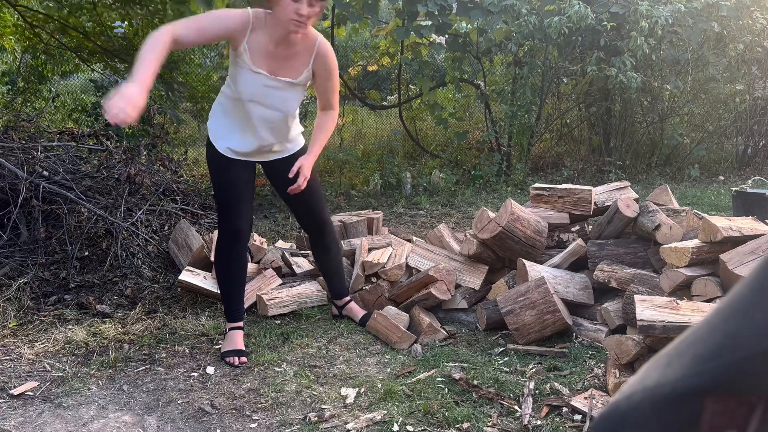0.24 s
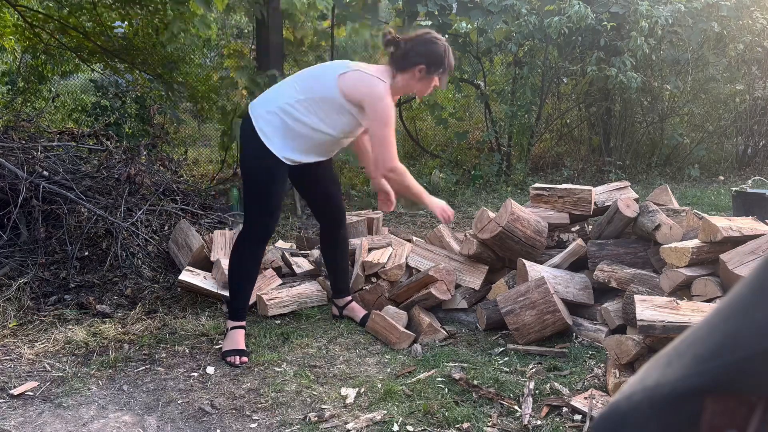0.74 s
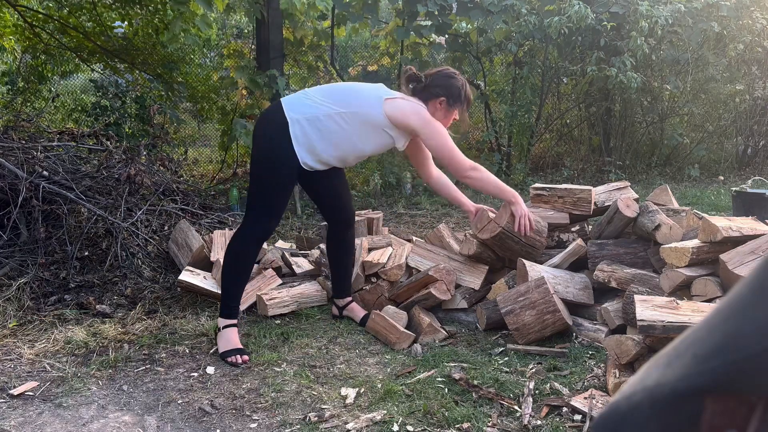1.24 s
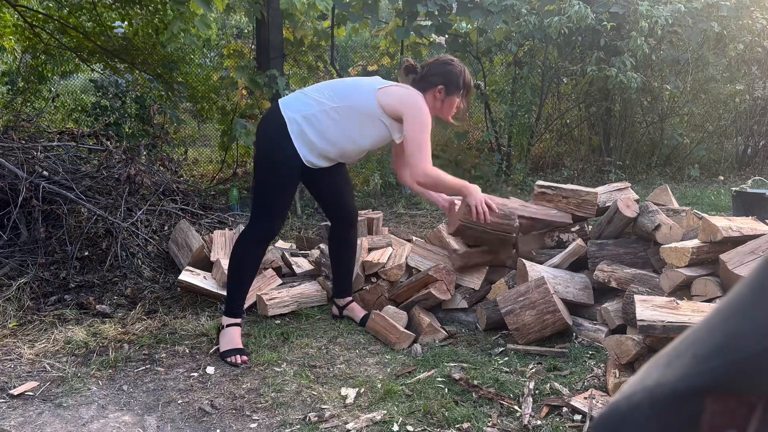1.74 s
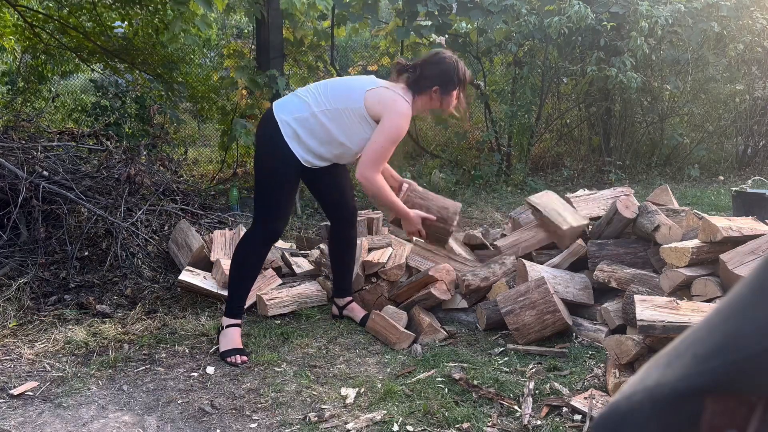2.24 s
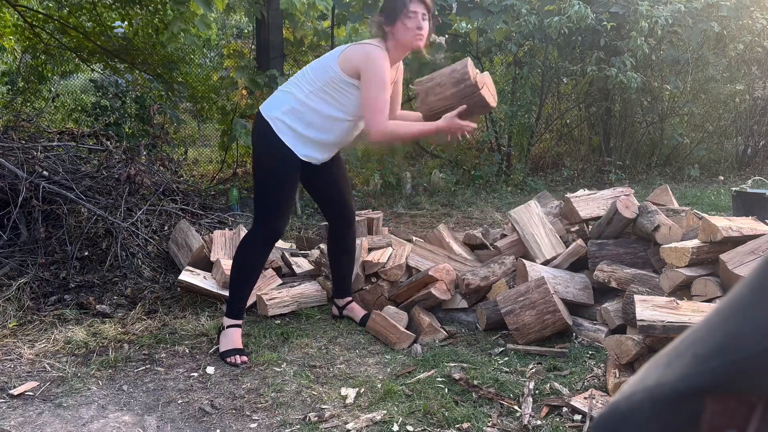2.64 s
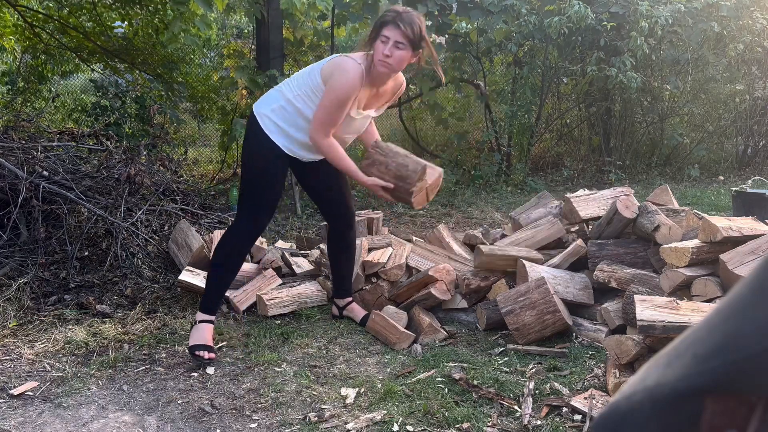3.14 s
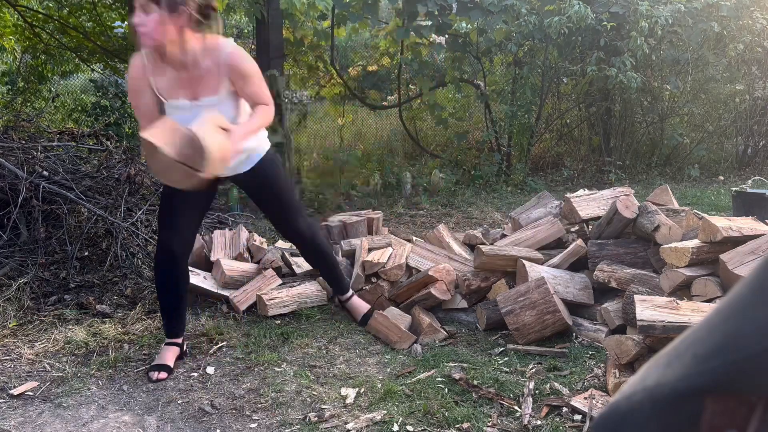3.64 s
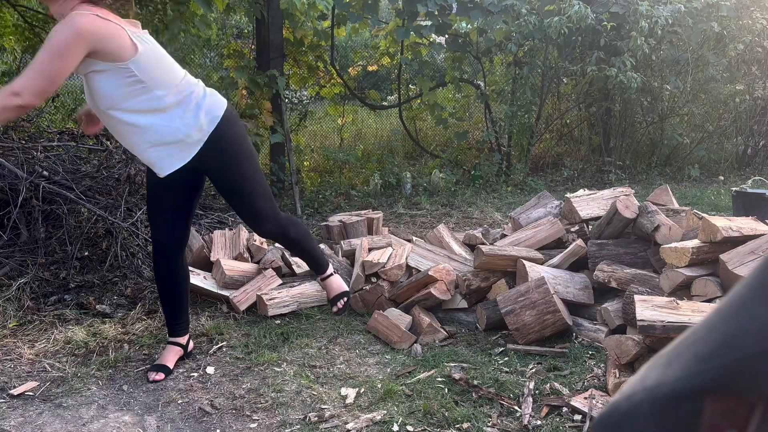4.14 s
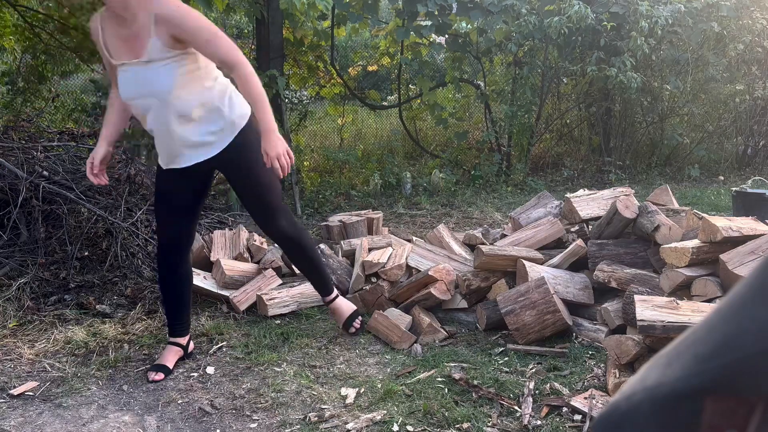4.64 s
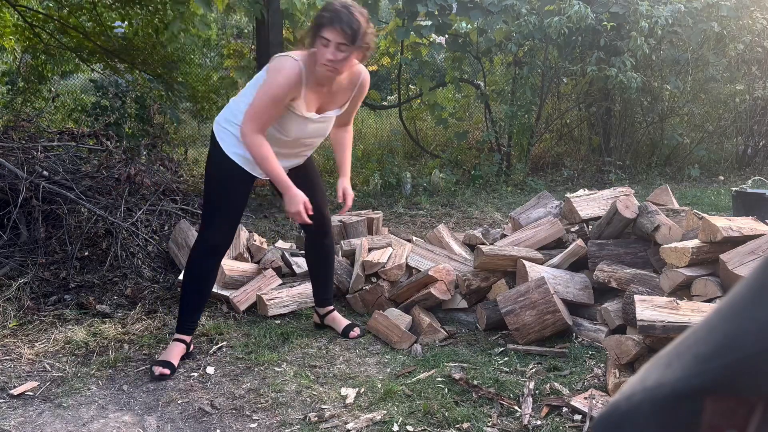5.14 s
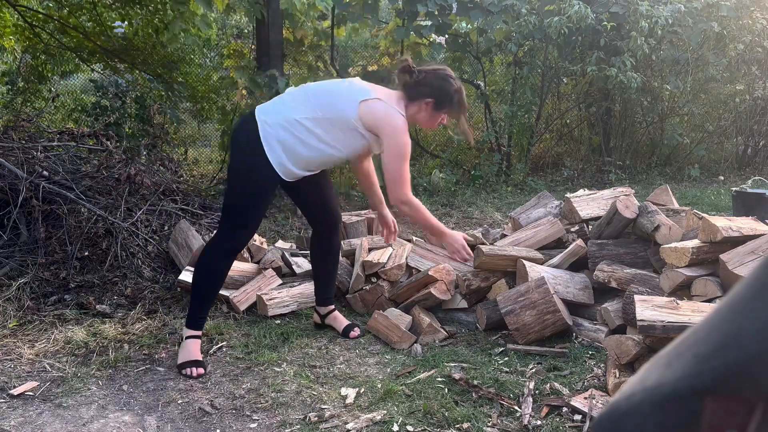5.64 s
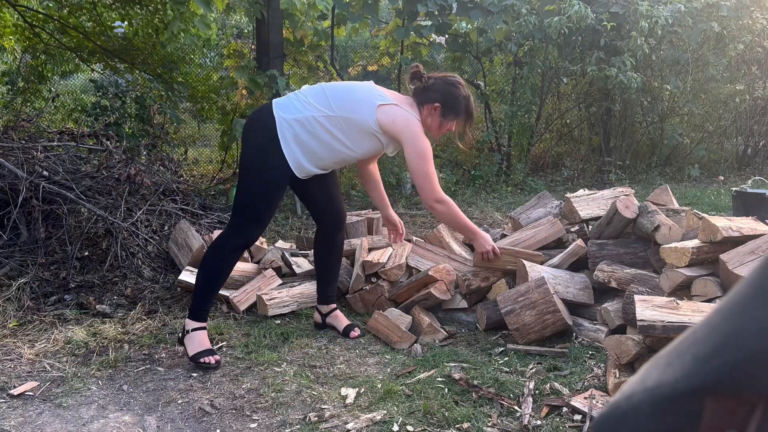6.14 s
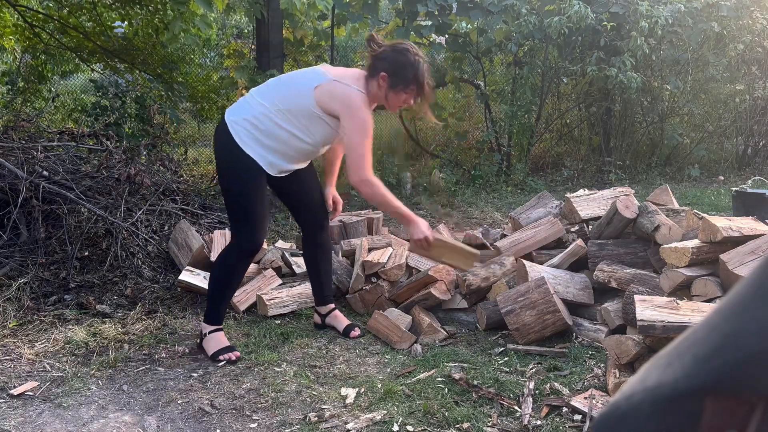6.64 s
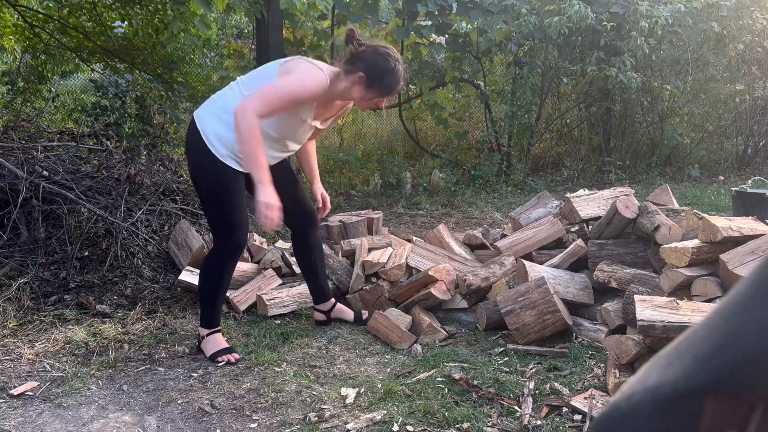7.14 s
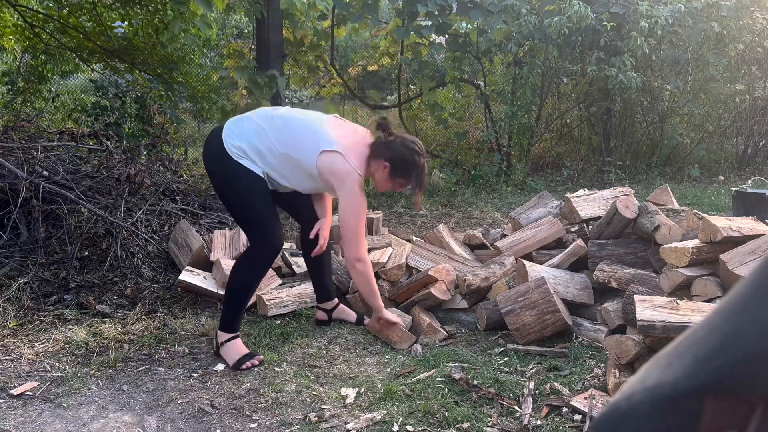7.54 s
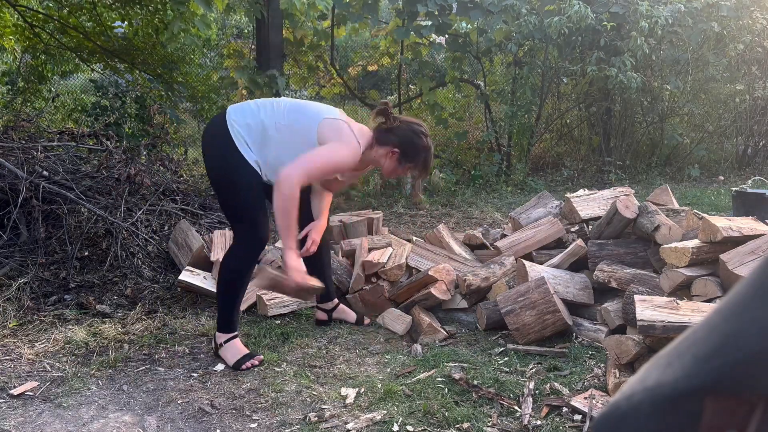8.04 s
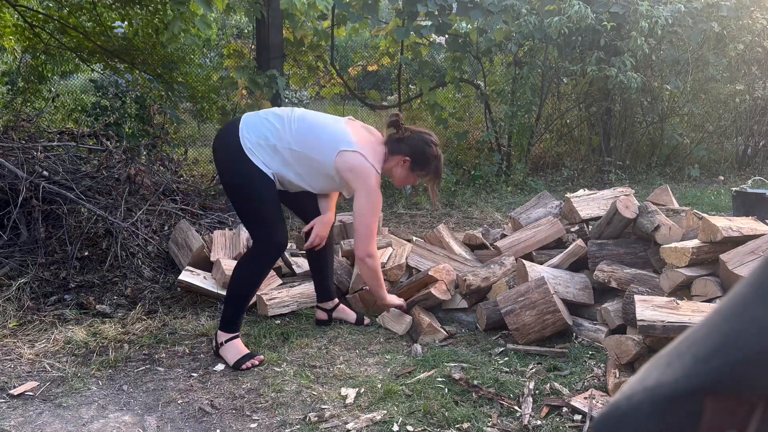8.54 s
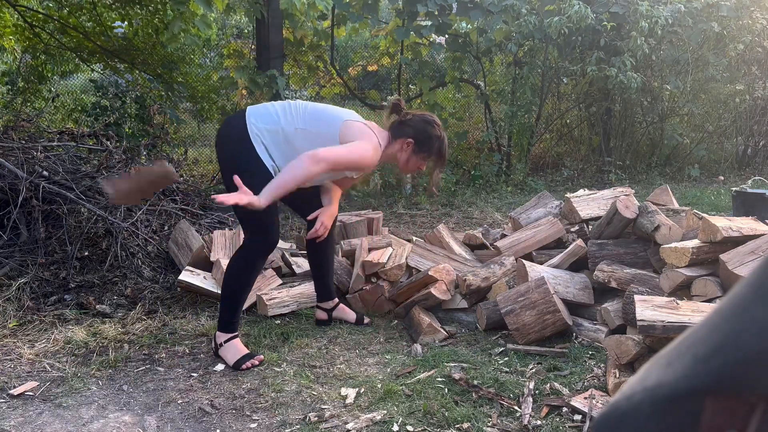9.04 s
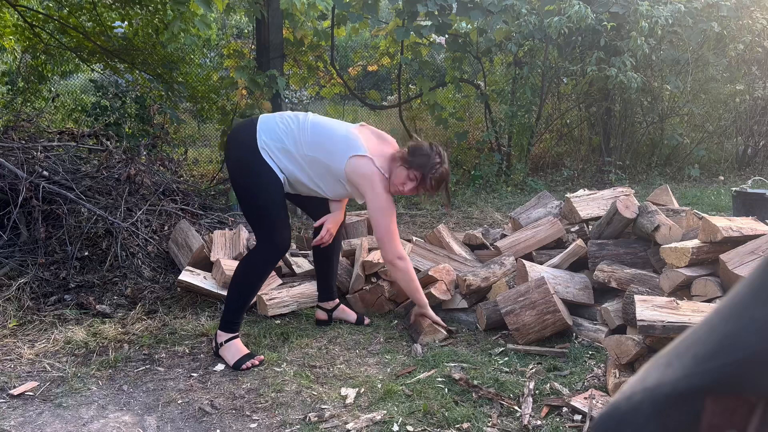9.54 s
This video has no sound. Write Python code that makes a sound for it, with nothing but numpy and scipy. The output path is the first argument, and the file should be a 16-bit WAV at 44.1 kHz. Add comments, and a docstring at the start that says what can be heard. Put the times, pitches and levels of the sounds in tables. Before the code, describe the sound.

A quiet wooded yard heard in stereo, with soft distant low rumble. Four throws of firewood strike a heap on the left: one early, a longer clattering tumble midway, a bright knock later and a softer one near the end. Between them, close and central, rough bark rubs, logs shuffle with muted thumps, twigs crack, gripped wood creaks faintly and little metal pieces jingle very high. The trees return a slight dull echo.

```python
"""A low distant rumble comes first; then bark scrapes, the near woodpile shifts and twigs snap.
Split logs land on a heap off to the left, where they knock, bounce and settle: struck modes, thuds and cracks.
Held wood creaks and squeaks as it sticks and slips; small metal pieces, like jewellery, tinkle as high modes.
The heap scatters every blow and the trees return a faint echo, both made of decaying noise."""
import sys
import numpy as np
from scipy import signal
from scipy.fft import rfft, irfft, next_fast_len
from scipy.io import wavfile
from scipy.ndimage import uniform_filter1d, map_coordinates

SR = 44100
rng = np.random.default_rng(int(sys.argv[2]) if len(sys.argv) > 2 else 0)


def bounce(signal):
    """Save signal as a 16-bit WAV file at the path given by the first command-line argument."""
    frames = np.transpose(np.atleast_2d(signal))
    limited = np.clip(frames, -1, 1)
    pcm = np.round(limited * 32767).astype(np.int16)
    wavfile.write(sys.argv[1], SR, pcm)


N = 431738
T = np.arange(SR // 2) / SR  # the time of one blow [s]
TOP_HZ = 16000
AIR_DB = -62

# All levels in the tables are relative: each layer has its own trim.
# spectrum of the distant rumble: (frequency [Hz], level [dB])
AIR = [(20, -34.5), (40, -8.5), (72, 0.5), (110, -8), (200, -15), (400, -18), (650, -18.5), (900, -25),
       (1400, -26), (2200, -42.5), (5000, -44.5), (10000, -48.5), (16000, -56)]
# quiet rustle of bark and litter between strokes: (time [s], treble level [dB], highest hiss level [dB])
RUSTLE = [(0.0, -117, -112), (0.38, -103.5, -91), (1.5, -73.5, -76.5), (1.96, -66, -71.5),
          (3.9, -68.5, -72), (4.2, -79, -80), (4.55, -78, -76.5), (4.71, -56, -76), (5.62, -63.5, -89),
          (5.97, -81.5, -64.5), (6.13, -72.5, -82.5), (6.65, -99, -90.5), (7.5, -85.5, -84.5),
          (7.99, -62, -74), (8.4, -108, -100), (9.03, -99, -91), (9.21, -64, -77), (9.79, -86.5, -84)]
# bark sliding over bark or litter: (time [s], length [s], scrape level [dB], hiss level [dB])
SCRAPES = [(0.416, 0.12, -74, -72), (0.535, 0.03, -63, -78), (1.228, 0.14, -53, -64.5),
           (1.467, 0.051, -55.5, -57), (1.944, 0.081, -53.5, -54), (2.37, 0.044, -66.5, -62),
           (2.689, 0.07, -55, -60.5), (3.065, 0.028, -72, -50), (3.158, 0.055, -57, -59),
           (3.381, 0.086, -53.5, -55), (3.558, 0.019, -56.5, -54), (3.696, 0.06, -52.5, -59),
           (3.923, 0.035, -61, -59.5), (4.665, 0.036, -41, -59), (4.883, 0.17, -58, -65),
           (5.092, 0.074, -49.5, -72), (5.28, 0.063, -56.5, -71), (5.456, 0.016, -39.5, -63),
           (5.779, 0.072, -49.5, -65), (6.03, 0.047, -53.5, -68), (6.311, 0.05, -58.5, -66.5),
           (6.906, 0.045, -57, -62), (7.583, 0.048, -65.5, -65), (8.103, 0.067, -59, -67),
           (8.728, 0.053, -66, -67.5), (9.03, 0.17, -59, -72), (9.304, 0.03, -52.5, -72),
           (9.452, 0.096, -67, -75.5), (9.577, 0.058, -59, -67)]
SCRAPE_ATTACK_S, SCRAPE_RELEASE_T60 = 0.021, 0.058
# spectra of a scrape and of its hiss: (frequency [Hz], level [dB])
SCRAPE = [(500, -7.5), (900, -7.5), (1350, -2.5), (1750, -5), (2300, -5.5), (3700, -8.5), (6000, -7.5),
          (8000, -15.5), (12000, -38.5)]
HISS = [(4000, -15.5), (7000, -8.5), (8900, -2.5), (9800, 4), (10900, -4), (13500, -7), (16000, -10)]
# where wood is handled, as the delay to the right microphone: (time [s], lag [ms])
HANDLING_LAG = [(1.55, .44), (1.65, .03), (3.2, .03), (3.3, .29), (4.5, .29), (4.6, .44)]
# logs shifting in the near pile: (time [s], strength [dB], weight of the thud [dB],
# hardness of the contact [dB], freedom to ring [dB], own note [Hz])
SHIFTS = [(0.421, -64, 12, -11, 14.5, 253), (1.526, -48, 4.5, -2, -11, 302),
          (1.675, -46.5, -8, -10, 2, 486), (1.772, -54.5, 8, -7, 1, 316), (1.875, -47.5, 7.5, -1, -3, 390),
          (1.936, -45, 8.5, 0, 2, 433), (1.954, -51, 2.5, 7, 10.5, 1400), (1.989, -48.5, 3, 5, 2.5, 350),
          (2.059, -43, -1, -6, -8, 414), (2.082, -47.5, 9, -4, 5, 277), (2.115, -33, 0, -16, 1, 440),
          (2.299, -61.5, 17.5, 2, 13, 1410), (2.672, -61.5, 2, 11.5, 11, 525),
          (2.726, -55.5, 8, 12.5, 5.5, 1880), (2.868, -60.5, 15.5, 16, -16.5, 412),
          (2.984, -67.5, 22, 13, -5, 311), (3.133, -54, 13, 6.5, -20, 280.6),
          (3.368, -49.5, -5, 19, -5, 525), (3.681, -53, -1.5, -3.5, -5.5, 393),
          (5.677, -50, 6, -2, -9, 264), (5.778, -47, 13, 5.5, -21, 263.5), (5.862, -47, 7.5, 3.5, -14, 289),
          (6.024, -59, 22, 11, -25, 327), (7.444, -49, -2.5, -6.5, 2.5, 367.3)]
# logs landing and tumbling on the heap: (time [s], strength [dB], weight of the thud [dB],
# hardness of the contact [dB], freedom to ring [dB], own note [Hz])
LANDINGS = [(0.891, -17.5, -6, -3.5, 4.5, 516), (0.922, -26, -1.5, 1, 4, 585), (0.933, -33, -4, -8, 8, 400),
            (0.94, -41.5, -6, -2, 5, 2100), (0.963, -33.5, -20, -17, -2, 467),
            (1.206, -44.5, 16.5, -6, 3.5, 377), (4.531, -26.5, 0.5, 4.5, -1, 556),
            (4.533, -17, 3, 2.5, -1.5, 558.7), (4.542, -28, 3, 5.5, 1.5, 1950),
            (4.563, -27, -3, -9, -8, 343), (4.573, -35, -9.5, 7, 14, 1630),
            (4.591, -33, -16.5, 1, 2.5, 1600), (4.706, -34, 1.5, -2.5, -3.5, 517),
            (4.723, -43, 6.5, 5, 4, 2150), (4.756, -43, -4, -3, -19, 596), (4.8, -21, -8, -4.5, 5, 570),
            (4.843, -41.5, -10, -14, -3, 383), (4.872, -49, -11, 1, 5, 560),
            (4.926, -38, 7, 13.5, -32, 390), (4.955, -32.5, 9, 3.5, -1, 640),
            (5.085, -50, 9.5, -3, -9, 640), (5.125, -43, 8.5, 2.5, -2, 520), (5.359, -39, -6, -8, 7, 800),
            (5.49, -47.5, 4, -5.5, 0.5, 854), (7.734, -21.5, -7.5, 2.5, 4.5, 327),
            (7.739, -31, 9, 6.5, 10, 1362), (7.754, -35.5, 0.5, -1.5, 15, 1070),
            (7.777, -28, -1, -5.5, 5, 588), (7.796, -36, 4, -5, 9, 420), (8.009, -36.5, -3, -21, 4, 513),
            (8.027, -35, 4.5, -3.5, -1, 505), (8.102, -44, 3.5, 6.5, 6, 1602),
            (8.12, -58.5, 17, -13, 10.5, 1300), (8.186, -62.5, 22.5, 4.5, -4, 1380),
            (8.35, -50, 9, -11.5, 1.5, 1024), (9.017, -35, 5.5, -0.5, -14, 740),
            (9.03, -39, 14.5, 0.5, 1.5, 990)]
# modes of logs in the near pile, before contact damping: (frequency [Hz], level [dB], t60 [s])
WOOD = [(170, -4.5, 0.15), (313, -2.5, 0.079), (471, -3, .08), (703, -4, 0.021), (1092, -5, .04),
        (1300, 2, 0.051), (1760, 0, .04), (2250, 0.5, 0.032), (2636, 1, 0.032)]
# modes of each of the four thrown logs, before contact damping: (frequency [Hz], level [dB], t60 [s])
LOG_1 = [(179.1, -7.5, 0.16), (357.3, -2, 0.13), (527, 3, .05), (606, -2, 0.045), (749, 5, 0.046),
         (1060, -1.5, 0.044), (1233, -6.5, 0.093), (1378, -6, 0.054), (1510, -6.5, 0.065),
         (1600, -2, 0.079), (1850, -7, 0.037), (2120, -8, .04), (2500, -8, 0.055)]
LOG_2 = [(180.1, -8.5, 0.12), (350, 2.5, 0.072), (474, -4.5, 0.032), (620, 1.5, 0.09), (750, 4, 0.02),
         (970, -2.5, 0.014), (1300, -3.5, .05), (1634, -2.5, 0.06), (1680, -6, 0.032), (1808, -9, 0.07),
         (1995, -9, .04), (2450, -6, 0.044), (2780, -9.5, .04)]
LOG_3 = [(319, -5.5, 0.088), (414, -1, 0.05), (487, -4, 0.037), (661, 1.5, .05), (1080, 0.5, 0.07),
         (1210, 2, 0.19), (1300, 3.5, 0.069), (1412, -3.5, 0.054), (1603, -0.5, 0.057), (2034, -19.5, .04),
         (2440, -12.5, .04), (3200, -0.5, 0.028)]
LOG_4 = [(157.4, -2.5, 0.09), (315, -3, 0.062), (441, -15, .04), (563, -0.5, 0.032), (740, 3, 0.026),
         (864, 2.5, 0.04), (990, -20, 0.03), (1140, 4, 0.057), (1280, 2, 0.084), (1420, -8, .04)]
# which log is tumbling: (start time [s], its modes)
THROWS = [(0, LOG_1), (4, LOG_2), (7, LOG_3), (9, LOG_4)]
# bands of a blow, from thud through body, clack and bite to crack: (low edge [Hz], high edge [Hz])
BAND_EDGES = [(55, 250), (250, 900), (900, 2000), (2000, 3500), (3500, 16000)]
# a blow on the pile or the heap, one row per band:
# (level [dB], share of its weight [dB/dB], share of its hardness [dB/dB], share of its ring [dB/dB])
PILE_BLOW = [(-8.5, 1, 0.054, 0.15), (-4.5, 0, 0.066, 0.15), (-11, 0.13, 0.48, 0.87), (-14, 0.12, .9, .35),
             (-23.5, 0, 0.93, -0.38)]
HEAP_BLOW = [(-11, 1, 0.034, 0.062), (2, 0.067, 0.055, 0), (-2.5, 0.22, 0.85, 1), (-12, 0.099, 0.91, .15),
             (-16, 0.31, 1, 0.038)]
# spectra of wood in contact and of its cracking: (frequency [Hz], level [dB])
CONTACT = [(100, -1.5), (250, -7.5), (400, 6), (700, -4.5), (1100, -4), (1800, -5), (2600, -15.5),
           (5000, -12)]
CRACK = [(2000, 3.5), (2600, 2.5), (3200, -0.5), (4500, 1), (6300, 2), (7500, -5), (10000, -8),
         (13000, -16.5), (16000, -22)]
# each contact reweights (dB) and detunes (share) the modes at random; all are damped alike (t60 in s)
CONTACT_SCATTER_DB, CONTACT_DETUNE, CONTACT_T60 = 2, .015, .055
# bark and twigs snapping: (time [s], level [dB], centre [Hz])
SNAPS = [(0.538, -44, 3530), (1.207, -31.5, 2830), (1.241, -48, 6500), (1.468, -39.5, 1980),
         (1.63, -43, 12500), (1.647, -37.5, 12500), (1.9372, -26.5, 2550), (1.962, -39, 2260),
         (1.998, -34, 2400), (2.0304, -39.5, 5470), (2.093, -36, 2190), (2.12, -32.5, 2420),
         (2.152, -41, 9300), (2.217, -50, 10000), (2.31, -35.5, 2380), (2.6752, -37, 10300),
         (2.871, -29.5, 3800), (3.092, -37, 10800), (3.509, -34.5, 10200), (3.57, -34, 8800),
         (3.9432, -40.5, 2660), (4.073, -37.5, 9500), (4.678, -40, 4200), (4.725, -35.5, 2370),
         (4.802, -31, 1930), (4.928, -25, 3000), (4.96, -20.5, 4680), (5.128, -40, 2210),
         (5.2989, -45, 4520), (5.466, -45, 2880), (5.779, -34, 2500), (6.993, -39, 9730),
         (7.5815, -30, 9820), (9.017, -28, 4150), (9.032, -27, 3830), (9.314, -38.5, 5540),
         (9.411, -36, 3920), (9.503, -36.5, 4000)]
# how much later the heap is heard on the right; low notes bend on their way: (frequency [Hz], lag [ms])
HEAP_LAG = [(100, 0.36), (600, 0.63), (1300, 0.4), (2200, 0.41), (6000, 0.452)]
# how much of the heap surrounds the tumbling log and scatters its knocks: (time [s], level [dB])
BURIED = [(.9, -3), (4.55, -1.5), (4.8, -7.5), (4.95, -1), (5.36, -2.5), (7.75, -1.5), (9.02, -1)]
# spectrum of the echo from the trees: (frequency [Hz], level [dB])
TREES = [(60, -15), (200, -5.5), (400, -2.5), (800, -2.5), (1150, 3.5), (1700, -7.5), (2500, -11.5),
         (4000, -22.5), (10000, -44.5)]
# the grip on a log as it is dragged out and lifted: (time [s], level [dB])
GRIP = [(0, -100.5), (1.6, -73), (1.95, -54), (2.3, -60), (2.6, -62), (2.9, -72), (3.19, -57.5),
        (3.33, -73.5), (4.2, -80.5), (6.1, -74), (6.45, -73.5), (6.8, -84.5), (9.79, -79)]
# modes of a log damped by the hands: (frequency [Hz], level [dB], t60 [s])
HELD_LOG = [(1312, -1, 0.12), (1460, -4.5, 0.036), (1870, -4.5, 0.01), (2230, -1, 0.024),
            (2390, -2.5, 0.011)]
# shakes of the small metal pieces: (time [s], length [s], level [dB], strongest ring [Hz])
SHAKES = [(1.66, .21, -51.5, 10040), (1.698, .1, -54, 12900), (2.218, .42, -53.5, 9700),
          (2.758, .1, -49, 9600), (3.365, .03, -37, 9300), (5.87, .06, -39, 9900), (5.9, .13, -41.5, 13200),
          (6.605, .03, -43, 10400), (7.175, .18, -57, 13040)]
# modes of the metal: (frequency [Hz], level [dB], t60 [s])
METAL = [(9400, -4, .14), (9800, -2, .13), (10180, -1, .13), (12900, -1, .11), (13350, -2, .14),
         (13720, -3, .14)]
TOUCH_GAP_S, TOUCH_SAG_DB_PER_S = 0.019, 9  # the pieces meet again and again, ever more lightly on average
# wood squeaking on wood: (time [s], length [s], level [dB], pitch [Hz])
SQUEAKS = [(2.494, 0.018, -54.5, 1790), (2.958, 0.022, -56, 1920), (3.045, 0.014, -60.5, 1600),
           (3.185, 0.028, -52, 2200), (5.89, 0.029, -62, 4600), (6.0, .025, -55.5, 4600),
           (6.099, .06, -64, 1330), (6.31, 0.052, -63, 2360), (6.409, 0.019, -59, 1380),
           (9.154, 0.044, -57, 2330)]


def undb(db):
    """Decibels to gain."""
    return 10 ** (np.asarray(db) / 20)


def fade(t60, t=T):
    """Exponential decay, 60 dB down after t60."""
    return np.exp(-np.log(1000) * t / max(abs(t60), 1e-4))


def unit(x):
    """Scale to an energy of one."""
    return x / np.sqrt(np.sum(x ** 2))


def band(x, lo, hi, order=3):
    """Causal band-pass."""
    return signal.sosfilt(signal.butter(order, [lo, hi], "band", fs=SR, output="sos"), x + 1e-18)


def colour(x, points):
    """Minimum-phase filter through (Hz, dB) points that keeps the power of white noise."""
    size = 4096
    hz, db = np.transpose(points)
    bins_hz = np.arange(size // 2 + 1) * SR / size
    log_gain = np.log(undb(np.interp(np.log(bins_hz + 1), np.log(hz), db)))
    cepstrum = irfft(log_gain)[:size // 2]
    cepstrum[1:] *= 2  # folding the cepstrum makes the filter causal
    impulse = unit(irfft(np.exp(rfft(cepstrum, size))))
    return signal.fftconvolve(x, impulse)[:len(x)]


def grains(count, spread_db):
    """Noise whose samples differ widely in size: many tiny contacts."""
    x = rng.standard_normal(count) * undb(spread_db * np.minimum(rng.exponential(size=count), 2 * np.pi))
    return x / x.std()


def walk(rate):
    """Slow random wandering with a spread near one."""
    k = int(SR / rate)
    steps = np.repeat(rng.standard_normal(N // k + 1), k)
    return np.sqrt(2) * uniform_filter1d(uniform_filter1d(steps, k), k)[:N]


def curves(table):
    """Rows of (s, dB, ..) to one gain per sample for each column."""
    s, *columns = np.transpose(table)
    return [undb(np.interp(np.arange(N) / SR, s, c)) for c in columns]


def waver(x, drift_s, rate):
    """Read a sound through a wandering delay, which smears its pitch."""
    n = np.arange(N)
    return np.interp(n + drift_s * SR * walk(rate), n, x)


def ring(modes, scatter_db, detune):
    """Damped modes; each point of contact weights and tunes them a little differently."""
    chance = rng.standard_normal((len(modes), 3))
    total = 0
    for (hz, db, t60), (weight, tuning, sign) in zip(modes, chance):
        tone = np.sin(2 * np.pi * hz * (1 + detune * tuning) * T)
        total = total + undb(db + scatter_db * weight) * np.sign(sign) * fade(t60) * tone
    return unit(total)


def add(track, s, sound):
    """Mix a sound into a track at time s."""
    start = int(s * SR)
    track[..., start:start + sound.shape[-1]] += sound[..., :N - start]


def ports(x, lag_ms, pan_db):
    """Two microphones: sound from the left reaches the right one later, by (Hz, ms) points, and weaker."""
    size = next_fast_len(len(x) + SR // 50, True)
    hz = np.arange(size // 2 + 1) * SR / size
    lag_s = np.interp(hz, *np.transpose(lag_ms)) / 1000
    late = irfft(rfft(x, size) * np.exp(-2j * np.pi * hz * lag_s), size)[:len(x)]
    return np.array([x * undb(pan_db / 2), late * undb(-pan_db / 2)])


def tail(t60, rise, t=T):
    """A swarm of reflections that builds up and dies away."""
    return unit(rng.standard_normal(len(t)) * fade(t60, t) * (1 - np.exp(-(t / rise) ** 2)))


def path(lag_ms, pan_db, scatter_db, diffuse_db, t60, rise_s):
    """From a spot to both microphones: direct sound, uneven echoes beside it and scatter from all around."""
    lumps = uniform_filter1d(rng.standard_normal(len(T)), SR // 200)
    near = undb(scatter_db) * unit(tail(t60, 2 * rise_s) * undb(5 * lumps / lumps.std()))
    near[0] += 1  # the direct sound
    mid = tail(t60, rise_s)
    side = signal.lfilter([1, -1], [1, -.96], tail(t60, rise_s))  # without bass, so the sides agree there
    around = np.array([mid + side, mid - side]) / np.sqrt(2)
    return ports(near, lag_ms, pan_db) + undb(diffuse_db) * around


def through(x, response):
    """Play a sound through a two-channel response."""
    return signal.fftconvolve(x[None], response, axes=1)[:, :len(x)]


def air(level_db, apart):
    """A distant rumble: coloured noise that swells gently, most alike at both microphones in the bass."""
    shared = ports(colour(rng.standard_normal(N), AIR), [(0, .43)], 1.5)
    own = np.array([band(colour(rng.standard_normal(N), AIR), 89, TOP_HZ, order=1) for _ in range(2)])
    return (shared + apart * own) * undb(AIR_DB + level_db + walk(2.1))


def sliding():
    """Each stroke swells, holds and dies away; gives the gain of the scrape and of its hiss."""
    gains = np.zeros((2, N))
    for s, length, *levels_db in SCRAPES:
        release = fade(SCRAPE_RELEASE_T60, np.maximum(T - length, 0))
        stroke = np.clip(T / SCRAPE_ATTACK_S, 0, 1) * release
        add(gains, max(s, 0), np.outer(undb(levels_db), stroke))
    return gains


def rubbing(scrape_db, hiss_db, rustle_db, rustle_hiss_db, uneven_db):
    """Rough bark and dry litter catch and slip in uneven runs of tiny clicks."""
    stroke, stroke_hiss = sliding()
    treble, top = curves(RUSTLE)
    scrape = np.hypot(undb(scrape_db) * stroke, undb(rustle_db) * treble)
    hiss = np.hypot(undb(hiss_db) * stroke_hiss, undb(rustle_hiss_db) * top)
    slips = undb(uneven_db * walk(70))
    return slips * (scrape * colour(grains(N, 3.9), SCRAPE) + hiss * colour(grains(N, 2.1), HISS))


def patchy(x, patchy_db, rate):
    """Coarse and fine patches of bark pass in turn: all bands but the top swell and fade on their own."""
    out = 0
    for hz in (2200, 3800, 6500, 11000):
        low = signal.sosfiltfilt(signal.butter(2, hz, fs=SR, output="sos"), x)
        out = out + low * undb(patchy_db * walk(rate))
        x = x - low
    return out + x


def crumbs(level_db, spread_db, cycles, low_hz, high_hz, count):
    """Flakes of bark break as wood is handled, each with its own pitch and level; the higher, the shorter."""
    track, t = np.zeros(N), T[:SR // 100]
    handling = np.hypot(curves(RUSTLE)[0], sliding()[0] / 10)
    for when, pitch, rarity in rng.random((count, 3)):
        hz = low_hz * (high_hz / low_hz) ** pitch
        # low draws make the few loud flakes
        gain = handling[int(when * N)] * undb(level_db - spread_db * np.log(max(rarity, .04)))
        add(track, when * N / SR, gain * fade(cycles / hz, t) * np.sin(2 * np.pi * hz * t))
    return track


def ahead_spot():
    """A place straight ahead, among the split logs."""
    return path(lag_ms=[(0, 0)], pan_db=1.0, scatter_db=-20, diffuse_db=-2, t60=.07, rise_s=.001)


def carried(pair):
    """The sound moves with the hands: it reaches the right microphone later when they are to the left."""
    n = np.arange(N)
    lag = np.interp(n / SR, *np.transpose(HANDLING_LAG)) * SR / 1000
    return np.array([pair[0], map_coordinates(pair[1], [n - lag], mode="nearest")])


def pile_spot(s):
    """A place on the near pile: close, so mostly direct sound."""
    lag_ms = np.interp(s, *np.transpose(HANDLING_LAG))
    return path(lag_ms=[(0, lag_ms)], pan_db=1.0, scatter_db=-18, diffuse_db=-6, t60=0.096, rise_s=.002)


def knocks(table, logs, blow, spot, crush_s, solid, dull_hz, modes_db, modes_share,
           note_db, note_share, note_t60, thud_t60, splinter_db, splinter_t60):
    """Each blow crushes bark in a few quick contacts; the wood rings, the ground thuds, splinters crackle."""
    track, head = np.zeros((2, N)), SR // 40  # the level is set over the first 25 ms
    for s, strength_db, weight_db, hard_db, ring_db, note_hz in table:
        log = [modes for since, modes in logs if since <= s][-1]
        crush = grains(len(T), 3.4) * np.sqrt(T) * fade(np.log(1000) * crush_s)
        push = unit(signal.lfilter([1, -1], [1, -.9], crush))
        push[int(2 * crush_s * SR)] += solid  # the bark touches first, solid wood just after
        damped_log = ring(log, CONTACT_SCATTER_DB, CONTACT_DETUNE) * fade(CONTACT_T60)
        modes = unit(signal.fftconvolve(push, damped_log)[:len(T)])
        note = unit(fade(note_t60) * (1 - fade(0.013)) * np.sin(2 * np.pi * note_hz * T))
        # hard blows rebound and let the wood ring; soft ones stay in contact and damp it
        wood = colour(unit(push), CONTACT) + undb(modes_db + modes_share * hard_db) * modes
        wood = band(wood, 33, dull_hz, order=1) + undb(note_db + note_share * ring_db) * note
        thud = unit(rng.standard_normal(len(T)) * fade(thud_t60)) + wood
        splinters = unit(grains(len(T), 0.99) * fade(splinter_t60))
        crack = colour(unit(push) + undb(splinter_db) * splinters, CRACK)
        response = spot(s)  # every blow falls in another place
        parts = (thud, wood, wood, wood + crack, crack)
        for part, edges, (db, heavy, hard, free) in zip(parts, BAND_EDGES, blow):
            part = band(through(part, response), *edges, order=4)
            level_db = strength_db + db + heavy * weight_db + hard * hard_db + free * ring_db
            add(track, s, part * undb(level_db) / part[:, :head].std())
    return track


def shifting_pile():
    """Logs shift in the near pile: soft, dull contacts with short notes."""
    return knocks(SHIFTS, [(0, WOOD)], PILE_BLOW, pile_spot, crush_s=.0031, solid=0.63, dull_hz=464,
                  modes_db=-12.5, modes_share=0.25, note_db=-9.0, note_share=0.56, note_t60=0.019,
                  thud_t60=0.25, splinter_db=5.0, splinter_t60=0.079)


def snaps(t60, level_db, fibres, ringing, cycles):
    """A splinter breaks: a sharp click and tearing fibres, which ring the stub for a few cycles."""
    track = np.zeros(N)
    for s, db, hz in SNAPS:
        burst = fibres * unit(grains(len(T), 5.4) * fade(t60))
        burst[0] += 1
        click = colour(burst, [(hz / 8, -24), (hz * 0.76, -7), (hz, 0), (hz * 1.2, -7), (hz * 3, -16)])
        stub = signal.fftconvolve(burst, fade(cycles / hz) * np.sin(2 * np.pi * hz * T))[:len(T)]
        snap = unit(click) + ringing * unit(stub)
        add(track, s, snap * undb(db + level_db) / np.abs(snap).max())
    return track


def heap_spot(s):
    """A place on the heap, far to the left, where surrounding logs scatter the sound."""
    buried_db = np.interp(s, *np.transpose(BURIED))
    return path(lag_ms=HEAP_LAG, pan_db=3.0, scatter_db=-9 + buried_db, diffuse_db=-5 + buried_db,
                t60=0.18, rise_s=0.0054)


def landing_logs():
    """Thrown logs land and tumble on the heap: quick, bright contacts that ring each log's own modes."""
    return knocks(LANDINGS, THROWS, HEAP_BLOW, heap_spot, crush_s=.0017, solid=0.86, dull_hz=2934,
                  modes_db=-3.5, modes_share=0.11, note_db=-6, note_share=0.17, note_t60=0.026,
                  thud_t60=0.33, splinter_db=-2.0, splinter_t60=0.24)


def trees(x, level_db):
    """Trunks and foliage return a late, dull echo in which the notes of the wood blur into a wash."""
    t = np.arange(SR * 2) / SR
    echo = np.array([colour(tail(1.5, .05, t), TREES) for _ in range(2)])
    wash = through(x.mean(0), echo)
    return undb(level_db) * np.array([waver(side, .0008, 130) for side in wash])


def creaking(level_db, catches_per_s, drift_s, count):
    """The held log sticks and slips at several points; each catch rings it briefly and the pitch wanders."""
    creak = 0
    for _ in range(count):
        catches = rng.standard_normal(N) * (rng.random(N) < catches_per_s / SR)
        pressure = undb(4 * walk(25))
        pushes = pressure * catches / catches.std()
        creak = creak + signal.fftconvolve(pushes, ring(HELD_LOG, 1.7, 0.071))[:N]
    return undb(level_db) * curves(GRIP)[0] * waver(creak / np.sqrt(count), drift_s, 30)


def tinkles(level_db, tick, focus_hz, uneven_db):
    """Small metal pieces tick together and ring very high; modes near the struck one speak most."""
    track = np.zeros(N)
    for s, length, db, struck_hz in SHAKES:
        # a mode loses 1 dB for every focus_hz away from the struck one
        modes = [(hz, mode_db - abs(hz - struck_hz) / focus_hz, t60) for hz, mode_db, t60 in METAL]
        for after in np.arange(0, length, TOUCH_GAP_S):
            early, force = rng.random(), rng.standard_normal() * (after > 0)  # later touches vary in force
            metal = ring(modes, 3., .008)
            touch = unit(band(rng.standard_normal(len(T)) * fade(0.022), 5900, 20000))
            gain = undb(db + level_db - TOUCH_SAG_DB_PER_S * after + uneven_db * force)
            start = s + max(after - early * TOUCH_GAP_S / 2, 0)
            add(track, start, (metal + tick * touch) * gain / np.abs(metal).max())
    return track


def squeaks(level_db, sag, rough, width):
    """Wood slips on wood: a short rough note that sinks as the slip slows."""
    track = np.zeros(N)
    for s, length, db, hz in SQUEAKS:
        along = np.clip(T / length, 0, 1)
        jitter = uniform_filter1d(rng.standard_normal((2, len(T))), SR // 500, axis=1)
        jitter /= jitter.std()
        pitch_hz = hz * (1 - sag * (along - .5) + width * jitter[0])
        phase = 2 * np.pi * np.cumsum(pitch_hz) / SR
        swell = np.sin(np.pi * along) * (1 + rough * jitter[1])
        add(track, s, undb(db + level_db) * swell * np.sin(phase))
    return track


def scene():
    """Landings on the heap and handling at the pile, under the trees."""
    rumble = air(level_db=0, apart=0.72)
    scrapes = rubbing(scrape_db=-6, hiss_db=-4.5, rustle_db=-2.5, rustle_hiss_db=2.5, uneven_db=3.5)
    scrapes = patchy(scrapes, patchy_db=4, rate=55)
    flakes = crumbs(level_db=12, spread_db=7, cycles=4, low_hz=2400, high_hz=14000, count=1100)
    bark = flakes + scrapes + snaps(t60=0.017, level_db=6, fibres=0.33, ringing=.6, cycles=28)
    blows = shifting_pile() + landing_logs()
    held = creaking(level_db=-6.0, catches_per_s=45, drift_s=0.00046, count=4)
    held = held + squeaks(level_db=-2, sag=0.06, rough=0.54, width=0.015)
    metal = tinkles(level_db=-5, tick=0.25, focus_hz=231, uneven_db=5.5)
    near = blows + carried(through(bark, ahead_spot())) + through(held + metal, ahead_spot())
    return near + trees(near, level_db=-32.5) + rumble


def record(dry):
    """Round the highest peaks and cut the top."""
    return signal.sosfilt(signal.ellip(8, .2, 70, TOP_HZ, fs=SR, output="sos"), np.tanh(dry))


dry = scene()
out = record(dry)
bounce(out)
```